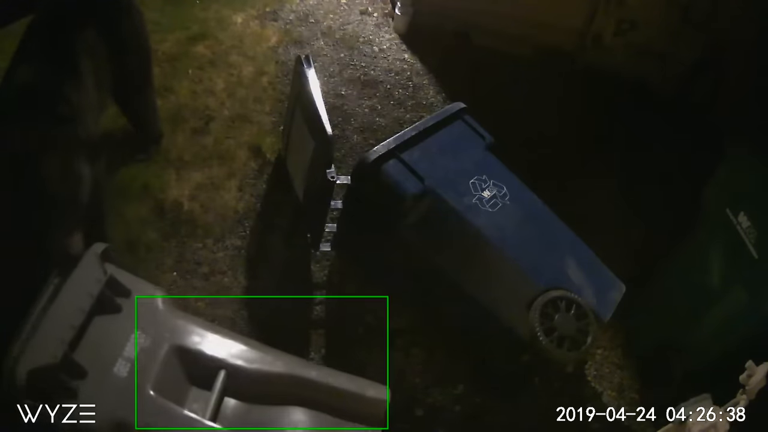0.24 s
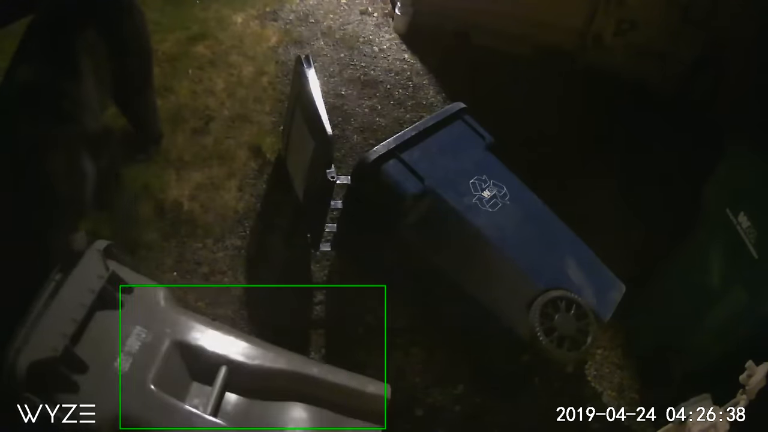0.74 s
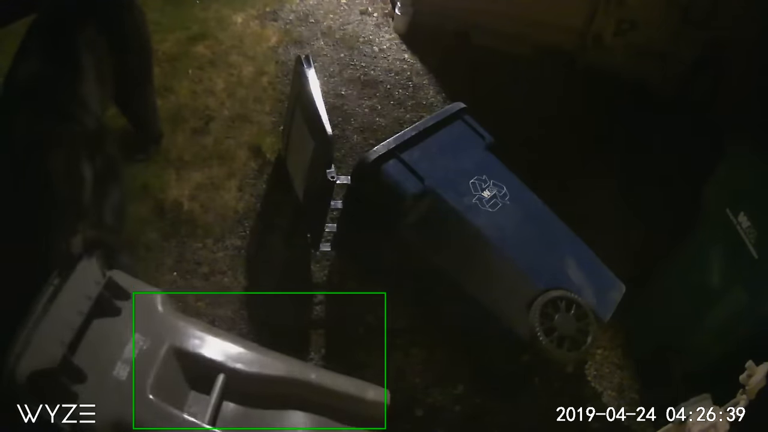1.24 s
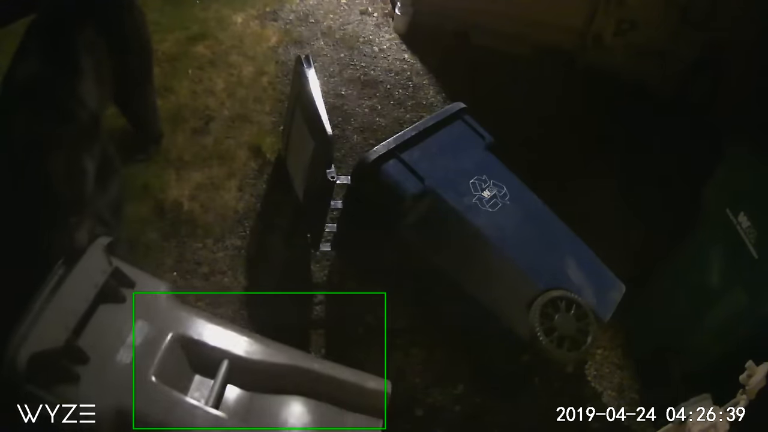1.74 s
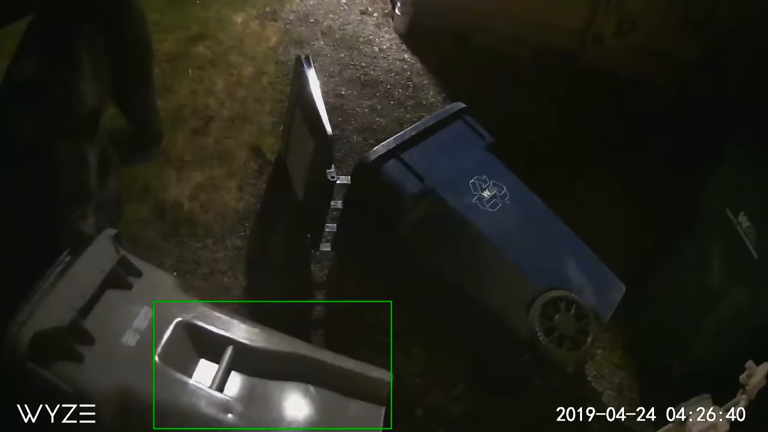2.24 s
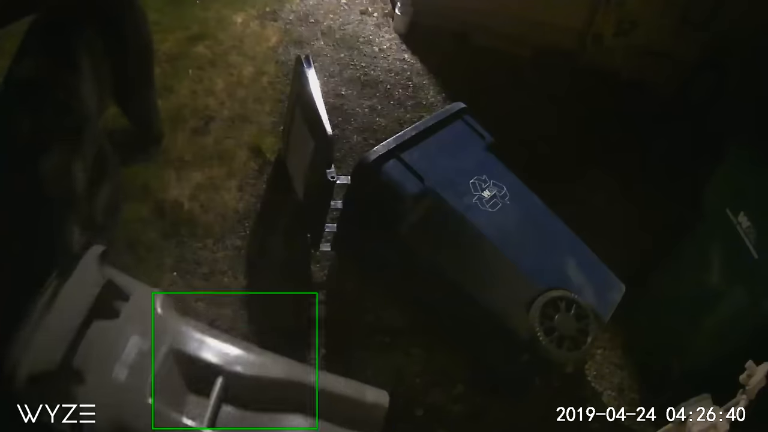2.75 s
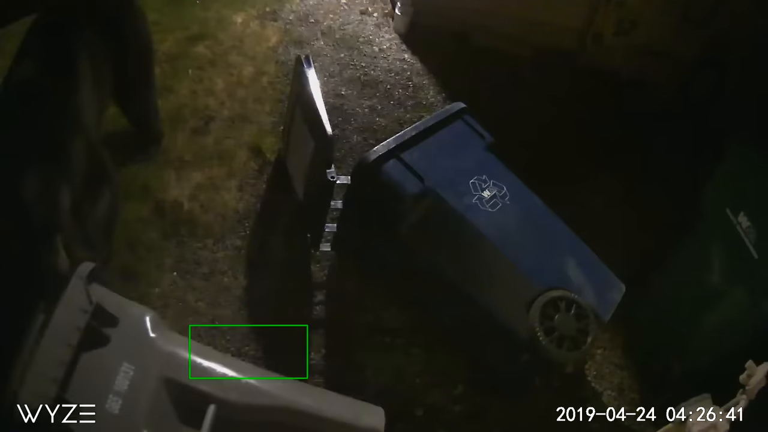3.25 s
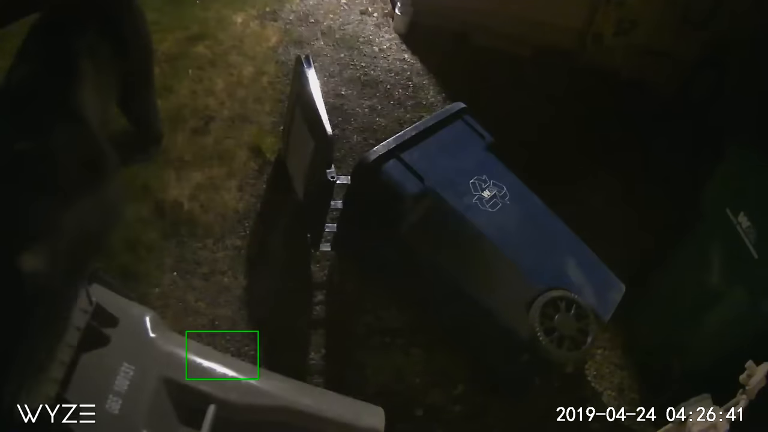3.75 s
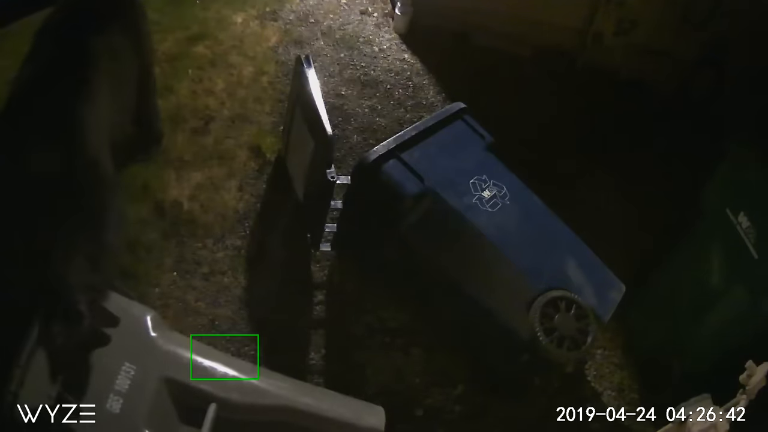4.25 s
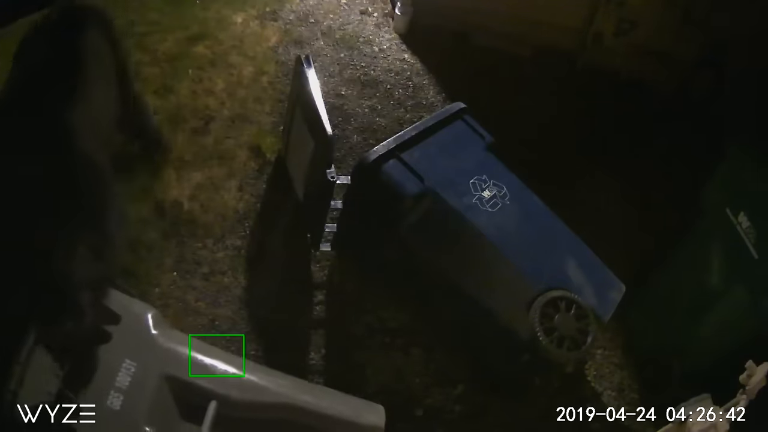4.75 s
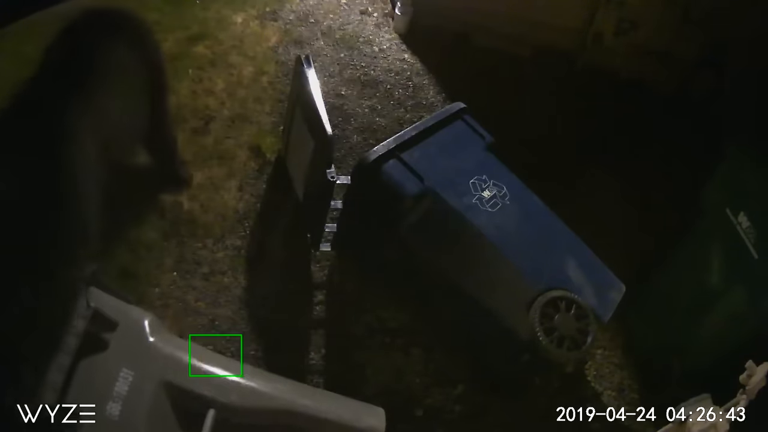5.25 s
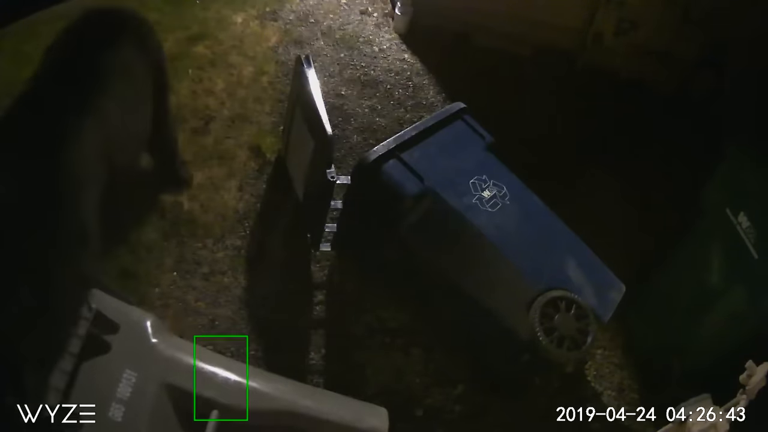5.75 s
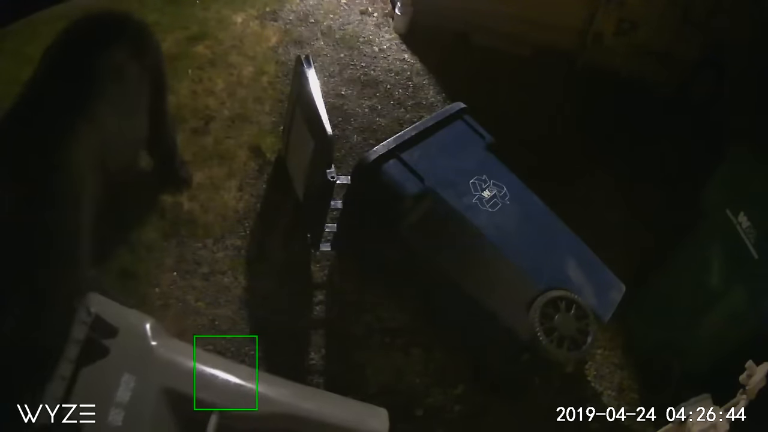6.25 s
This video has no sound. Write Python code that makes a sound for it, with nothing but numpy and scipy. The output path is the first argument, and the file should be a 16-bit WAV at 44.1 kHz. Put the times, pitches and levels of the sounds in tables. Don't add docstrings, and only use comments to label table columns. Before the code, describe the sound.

Claws and heavy paws hit the thin walls of a hollow plastic garbage bin, making short dull rattles over deep drum-like booms, with brief scrapes and gravel grit. Blows thin out to light taps, a loud bang breaks in, quiet follows, then the loudest tumble of knocks and scraping. The security camera sound is boxy, lacking clear treble, roughly digitized and ticking at regular dropouts.

```python
import sys
import numpy as np
from scipy import signal
from scipy.io import wavfile
from scipy.ndimage import uniform_filter1d, minimum_filter1d

SR = 44100
rng = np.random.default_rng(int(sys.argv[2]) if len(sys.argv) > 2 else 0)


def volts_from_db(level):
    exponent = np.asarray(level, float) / 20
    return 10 ** exponent


def master_out(mix):
    frames = np.transpose(np.atleast_2d(mix))
    ceiling = np.clip(frames, -1, 1)
    pcm = np.round(ceiling * 32767).astype(np.int16)
    wavfile.write(sys.argv[1], SR, pcm)


N = 287091
FIRST_CUT_S, PACKET_S, LOST_S = .0529, .12, .008
WORLD = N + int(56 * LOST_S * SR)
CONTROL_STEP = 32


def world_time(heard_s):
    return heard_s + LOST_S * np.ceil((np.asarray(heard_s) - FIRST_CUT_S) / PACKET_S)


def world_index(heard_s):
    return int(world_time(heard_s) * SR)


def ring(x, pitch_hz, width_hz):
    peak = signal.iirpeak(pitch_hz, pitch_hz / width_hz, fs=SR)
    return signal.lfilter(*peak, x) * np.sqrt(SR / (np.pi * width_hz))


def flutter(rate_hz, spread_db):
    hold = int(SR / rate_hz)
    steps = np.repeat(rng.standard_normal(WORLD // hold + 1), hold)
    level = uniform_filter1d(steps, hold // 2)[:WORLD]
    return volts_from_db(spread_db * level) / volts_from_db(spread_db ** 2 * np.log(10) / 20)


def decay(t, t60_s):
    return 1000 ** (-t / t60_s)


def motions(start_s, level_db, rise_s, fall_s, hold_s=0):
    t = np.arange(0, WORLD, CONTROL_STEP) / SR
    early_s = np.maximum(world_time(start_s)[:, None] - t, 0)
    late_s = np.maximum(t - world_time(start_s + hold_s)[:, None], 0)
    return level_db[:, None] - 30 * (early_s / rise_s[:, None] + late_s / fall_s[:, None])


def loudest(*levels_db):
    tops = [np.max(np.atleast_2d(level), axis=0) for level in levels_db]
    top = np.max(np.vstack(np.broadcast_arrays(*tops)), axis=0)
    return np.interp(np.arange(WORLD), np.arange(0, WORLD, CONTROL_STEP), top)


# peak_s, rumble_db, rise_s, fall_s, low_panel_share_db
SHOVES = [(.05, -28.5, 0.016, 0.43, 3.5), (.2, -18.5, .04, 0.36, -1), (.38, -17.5, 0.14, .13, -5.5),
          (0.559, -19, 0.22, 0.16, -7), (.98, -11.5, 0.055, 0.18, -11), (1.34, -38.5, 0.1, 0.15, -7),
          (1.56, -31.5, 0.21, 0.13, 3), (1.74, -28, 0.029, 0.28, -14), (1.85, -24, 0.17, 0.098, 4),
          (2.13, -24.5, 0.079, .21, 2), (2.48, -32, 0.057, 1.25, -18), (2.899, -19, .35, 0.19, -1.5),
          (3.55, -52, 0.52, 0.27, -12), (3.73, -13.5, 0.097, 0.13, -2.5), (4.02, -15.5, 0.11, 0.15, -5.5),
          (4.17, -26.5, 0.14, 0.15, -6.5), (4.33, -23.5, 0.081, 0.11, -14), (4.45, -47, .1, .8, -3),
          (5.29, -23, 0.11, 0.52, 1), (5.44, -23.5, 0.17, 0.24, -1), (5.64, -12.5, 0.14, .3, -4),
          (5.78, -17.5, 0.3, 0.13, 3), (6.02, -38, .5, .09, -3), (6.29, -37.5, 0.023, 0.13, 8.5)]


def shoves():
    *shape, share_db = np.transpose(SHOVES)
    rock_db = motions(*shape)
    return rock_db, rock_db + share_db[:, None]


# start_s, scrape_db, rise_s, fall_s, hold_s
DRAGS = [(0.052, -49, .02, .15, 0.082), (.2, -43.5, 0.045, .3, .1), (0.375, -32, 0.25, 0.13, .01),
         (0.467, -38.5, .07, 0.066, 0.011), (0.553, -45.5, 0.11, 0.14, .04), (1.102, -54, 0.29, 0.55, .38),
         (1.55, -50.5, .6, 0.23, .3), (2.117, -49, .06, .13, .15), (1.019, -39, .05, .25, 0.036),
         (1.244, -52, 0.092, .15, .08), (.66, -45, .03, .12, .09), (2.94, -38, .05, .12, .09),
         (2.68, -40, .17, 0.16, 0.2), (3.75, -56, .2, 0.74, 0.49), (4.415, -46, 0.13, 0.42, 0.19),
         (4.76, -47, .1, .2, 0.035), (4.94, -52.5, .08, .3, .14), (5.092, -37.5, .02, .6, .13),
         (5.27, -36.5, 0.3, .3, .05), (5.441, -22, 0.47, 0.27, 0.0071), (5.591, -22, 0.34, .22, 0.098),
         (5.86, -38.5, 0.19, .14, .15), (6.084, -55, .1, 0.19, .1), (6.297, -50.5, .05, .12, .1),
         (6.5, -46, 0.04, .1, .01)]


def drags():
    return motions(*np.transpose(DRAGS))


# start_s, rattle_peak_db, loudest_pitch_hz, rattle_t60_s
CLAWS = [(0.053, -18.5, 894, 0.12), (0.195, -12, 913, 0.088), (0.366, -17, 845, 0.18),
         (0.466, -21, 864, 0.15), (0.539, -9.5, 752, 0.14), (0.94, -20, 804, 0.16),
         (1.536, -20.5, 910, 0.19), (1.746, -24.5, 718, 0.074), (1.826, -16, 935, 0.22),
         (2.062, -31, 910, 0.34), (2.464, -23.5, 950, 0.1), (2.642, -27, 1023, 0.16),
         (2.695, -21.5, 833, 0.077), (2.77, -25.5, 800, 0.12), (3.713, -9, 1034, 0.17),
         (3.989, -28.5, 1050, 0.14), (4.306, -29, 690, 0.29), (4.013, -20, 798, 0.052),
         (5.33, -17, 834, 0.41), (5.374, -14.5, 1017, 0.16), (5.506, -24, 1040, 0.23),
         (5.58, -15, 1032, 0.11), (5.61, -9.5, 982, 0.21), (5.689, -14.5, 970, 0.25),
         (5.734, -16.5, 980, 0.065), (5.89, -20.5, 724, 0.16), (5.927, -11.5, 1015, 0.057),
         (3.714, -14, 810, 0.09), (6.296, -13, 980, 0.085)]
# start_s, rattle_peak_db, loudest_pitch_hz, rattle_t60_s
PAWS = [(0.101, -15, 455, 0.08), (0.237, -12, 362.6, 0.12), (0.269, -14.5, 367, 0.097),
        (0.313, -27, 320, 0.2), (0.941, -17.5, 437, 0.25), (0.969, -13.5, 880, 0.28),
        (1.497, -31.5, 545, 0.46), (1.732, -36, 526, 0.12), (1.786, -18.5, 344, 0.11),
        (2.115, -11.5, 371, 0.18), (2.558, -26, 368, 0.43), (2.811, -18, 323, 0.18),
        (2.871, -13, 597, 0.27), (2.902, -14.5, 405, 0.2), (3.031, -29, 696, 0.12),
        (3.669, -20.5, 605, 0.13), (3.964, -32.5, 395, 0.29), (4.012, -17.5, 679, 0.18),
        (4.129, -35, 330, 0.086), (4.164, -30.5, 690, 0.15), (4.323, -24.5, 361, 0.22),
        (4.97, -36, 344, 0.15), (5.091, -27, 381, 0.26), (5.165, -29, 330, 0.21), (5.221, -31.5, 624, 0.2),
        (5.271, -16.5, 448, 0.15), (5.548, -17, 660, 0.1), (5.759, -10, 403.5, 0.17),
        (5.847, -26.5, 410, 0.22), (0.59, -24, 285, 0.14)]
# start_s, rattle_peak_db, loudest_pitch_hz, rattle_t60_s
TAPS = [(2.075, -27, 700, 0.27), (1.335, -40.5, 460, 0.1), (1.37, -47.5, 295, 0.11),
        (1.453, -39, 428, 0.08), (1.984, -41, 704, 0.068), (3.092, -47.5, 505, 0.11),
        (3.32, -33.5, 623, 0.16), (3.387, -44.5, 330, 0.087), (3.53, -44.5, 387, 0.092),
        (3.59, -44.5, 686, 0.2), (3.609, -40, 1160, 0.19), (3.908, -44.5, 535, 0.22),
        (4.25, -43, 302, 0.096), (4.418, -46, 690, 0.19), (4.484, -45, 1195, 0.11), (4.606, -44, 830, 0.13),
        (4.654, -32, 1070, 0.15), (4.757, -43.5, 1010, 0.18), (4.931, -40, 483, 0.1),
        (5.062, -51, 370, 0.11), (5.95, -30.5, 990, 0.27), (6.121, -53, 930, 0.22), (6.17, -37, 778, 0.14),
        (6.266, -42, 1000, 0.16), (6.493, -39.5, 980, 0.17), (0.651, -29.5, 972, 0.13),
        (0.664, -31, 977, 0.14), (4.668, -29, 950, 0.072), (6.222, -27, 885, 0.13), (6.394, -31, 690, 0.12)]
# pitch_hz, level_db
WALL_COLOUR = [(150, -34), (250, -2), (331, -1.5), (531, -8.5), (606, -4), (660, -2), (873, -1), (1040, 1),
               (1600, -20.5), (2080, -55), (3520, -120)]
SPREAD_OCT, CONTACT_CYCLES, RING_T60_S, TAP_LOW_CUT_DB_PER_OCT = .25, 1.4, 0.057, 8.5
MIDDLE_HZ, FAR_DB, FAR_DB_PER_OCT = 690, -5.5, 1.04
RING_DB, RING_LOW_DB_PER_OCT, RING_HIGH_DB_PER_OCT = -8.5, 7.5, 8.5


def wall_blows(modes_hz):
    curve_hz, curve_db = np.transpose(WALL_COLOUR)
    colour = volts_from_db(np.interp(np.log(modes_hz), np.log(curve_hz), curve_db))
    t = np.arange(SR // 3) / SR
    length = WORLD + len(t)
    chatter = rng.standard_normal(length) * np.resize(flutter(140, 4.3), length)
    blows = CLAWS + PAWS + TAPS
    chance = rng.standard_normal((len(blows), len(modes_hz)))
    is_tap = np.arange(len(blows)) >= len(blows) - len(TAPS)
    push, clear = np.zeros((len(modes_hz), length)), np.zeros(length)
    for (start_s, level_db, spot_hz, t60_s), luck, light in zip(blows, chance, is_tap):
        spot_oct = np.log2(spot_hz / MIDDLE_HZ)
        far_db = FAR_DB + FAR_DB_PER_OCT * spot_oct
        ring_db = RING_DB + max(RING_HIGH_DB_PER_OCT * spot_oct, -RING_LOW_DB_PER_OCT * spot_oct)

        distance_oct = np.log2(modes_hz / spot_hz)
        near = np.exp(-(distance_oct / SPREAD_OCT) ** 2)
        share = near + volts_from_db(far_db + 2.5 * np.abs(luck)) * colour * np.sign(luck)
        share = share * volts_from_db(light * TAP_LOW_CUT_DB_PER_OCT * np.minimum(distance_oct, 0))

        i = world_index(start_s)
        rise_s = CONTACT_CYCLES / spot_hz
        onset = 1 - np.exp(-t / rise_s)
        force = chatter[i:i + len(t)] * onset * decay(t, t60_s)
        force[0] = 9 * 0.0022 / max(rise_s, .002)
        push[:, i:i + len(t)] += volts_from_db(level_db - 7) * np.outer(share / np.linalg.norm(share), force)
        tone = np.sin(2 * np.pi * spot_hz * t)
        clear[i:i + len(t)] += volts_from_db(level_db + ring_db) * onset * tone * decay(t, RING_T60_S)
    return push[:, :WORLD], clear[:WORLD]


# pitch_hz, level_db
RUB = [(260, 0), (400, -6), (660, -2), (900, -4), (1200, -1), (1480, -9.5)]
WALL_WIDTH_HZ = 55


def walls(scrape, low_gain):
    modes_hz = np.linspace(260, 1480, 28) * (1 + .015 * rng.standard_normal(28))
    push, out = wall_blows(modes_hz)
    curve_hz, curve_db = np.transpose(RUB)
    even = volts_from_db(np.interp(np.log(modes_hz), np.log(curve_hz), curve_db))
    rub = even * np.sign(rng.standard_normal(len(modes_hz))) / np.linalg.norm(even)
    low_scrape = scrape * low_gain
    for pitch_hz, blow, share in zip(modes_hz, push, rub):
        drive = low_scrape if pitch_hz < 600 else scrape
        out = out + ring(blow + share * drive, pitch_hz, WALL_WIDTH_HZ)
    return out


# start_s, peak_db, pitch_hz, t60_s
RINGS = [(.053, -22.5, 462, 0.063), (3.714, -11, 1055, .07), (.099, -22, 460, .08), (.195, -16.5, 431, .06),
         (.196, -17.5, 921, .05), (.266, -13, 381.5, .1), (.47, -25, 464, .14), (.533, -22.5, 302, 0.067),
         (.549, -19.5, 257, 0.089), (.603, -25.5, 280, 0.084), (.942, -22, 256, 0.073),
         (.966, -19, 633, 0.056), (1.744, -24.5, 740, .06), (1.825, -25.5, 732, 0.065),
         (.942, -21, 1034, .07), (2.064, -22, 963, .08), (2.113, -13, 394, 0.095), (2.19, -27, 255, 0.099),
         (2.64, -28, 700, 0.065), (5.58, -14, 1028, .06), (2.768, -24.5, 1077, 0.052),
         (2.811, -23, 607, 0.065), (2.866, -19.5, 322, .07), (2.868, -13, 598, .07),
         (2.899, -16.5, 388, 0.073), (2.905, -18, 600, 0.057), (3.731, -16, 330, .08),
         (6.295, -15, 991, .06), (4.321, -31.5, 1298, .06), (4.323, -30, 861, 0.065),
         (4.335, -28, 255, .08), (4.666, -29.5, 890, 0.082), (5.277, -19, 260, 0.068),
         (5.375, -15.5, 1170, .07), (5.441, -19, 1020, 0.062), (5.474, -25, 805, 0.066),
         (5.503, -22.5, 795, .06), (5.549, -19, 1124, .06), (5.575, -18, 380, .07), (5.611, -14, 533, .07),
         (5.632, -11.5, 1012, 0.097), (5.663, -16, 1057, .06), (5.685, -16, 1001, 0.057),
         (5.707, -17.5, 1160, .06), (5.731, -12.5, 1001, 0.064), (5.761, -14.5, 376, .07),
         (5.765, -17, 764, .05), (5.924, -17, 1023, 0.044), (5.98, -33, 392, .12), (6.294, -21, 458, 0.069)]
RING_RISE_CYCLES = 1.5


def lone_panels():
    t = np.arange(SR // 4) / SR
    out = np.zeros(WORLD + len(t))
    for start_s, peak_db, pitch_hz, t60_s in RINGS:
        i = world_index(start_s)
        swell = 1 - np.exp(-t * pitch_hz / RING_RISE_CYCLES)
        out[i:i + len(t)] += volts_from_db(peak_db) * swell * np.sin(2 * np.pi * pitch_hz * t) * decay(t, t60_s)
    return out[:WORLD]


# pitch_hz, width_hz, level_db
BODY = [(68.3, 17, 1.5), (87.3, 18, 2), (111.6, 16, -3.5), (140, 14, -4), (168.5, 21, -6), (198.6, 15, -5),
        (240.5, 58, -10.5)]


def body_murmur(rumble):
    out = np.zeros(WORLD)
    for k, (pitch_hz, width_hz, level_db) in enumerate(BODY):
        out += (-1) ** k * volts_from_db(level_db - 3.5) * ring(rumble, pitch_hz, width_hz)
    return out


# start_s, peak_db, pitch_hz, t60_s
BOOMS = [(0.094, -18, 163, 0.18), (0.193, -10.5, 133.3, 0.12), (0.538, -14.5, 86.3, 0.13),
         (0.95, -22, 114, 0.17), (0.975, -20, 137.7, 0.22), (1.335, -30.5, 95, 0.22),
         (1.539, -37.5, 277, 0.15), (1.548, -29, 94.2, 0.21), (1.803, -29, 140, 0.18),
         (1.823, -13.5, 83.2, 0.12), (2.111, -15, 51.5, 0.16), (2.465, -27.5, 98, 0.2),
         (2.828, -27, 134, 0.48), (2.887, -14, 118.6, 0.15), (3.198, -30, 73.8, 0.2),
         (3.345, -26, 74.3, 0.21), (3.503, -35.5, 77.5, 0.33), (2.065, -27, 80, 0.18),
         (3.722, -8.5, 74.9, 0.13), (4.009, -13.5, 125, 0.16), (4.153, -19.5, 107.2, 0.29),
         (4.322, -26.5, 85, 0.16), (4.585, -39.5, 167, 0.13), (1.975, -41, 85, 0.25),
         (5.149, -34, 91.3, 0.17), (5.29, -18, 195.2, 0.32), (5.404, -16.5, 100.7, 0.21),
         (5.635, -22, 145.4, 0.14), (6.112, -46, 66, 0.2), (6.287, -32, 239.6, 0.16),
         (0.196, -17, 91.6, .15), (.54, -21, 167.4, .13), (1.012, -14, 107.8, .17), (2.23, -30, 108, .16),
         (2.555, -28, 86, 0.14), (2.68, -30.5, 200, .14), (2.71, -31.5, 129, 0.16),
         (3.727, -17, 156.4, .13), (5.08, -41.5, 129, .15), (5.085, -39.5, 194, 0.17),
         (5.323, -20, 86, 0.13), (5.413, -21, 205.6, .15), (5.585, -19, 70, 0.27), (5.656, -9, 74.9, 0.21),
         (5.72, -17.5, 64.1, 0.31), (5.895, -27, 63.8, 0.49), (5.97, -28, 66.2, 0.24),
         (4.995, -42, 140, 0.17), (.76, -45, 62, 0.29), (1.735, -30, 100, 0.14)]
OVERTONE_DB, OVERTONE_DB_PER_DB = -6, 0.36


def body_booms():
    t = np.arange(SR // 2) / SR
    out = np.zeros(WORLD + len(t))
    for (start_s, peak_db, pitch_hz, t60_s), (turn, partner) in zip(BOOMS, rng.random((len(BOOMS), 2))):
        swell = (1 - np.exp(-t * pitch_hz / 0.29)) ** 2 * decay(t, t60_s)
        tone = np.sin(2 * np.pi * (pitch_hz * t + turn))
        overtone = np.sin(2 * np.pi * pitch_hz * (2.0 + .7 * partner) * t) * np.exp(-t / 0.04)
        overtone_db = OVERTONE_DB + OVERTONE_DB_PER_DB * (peak_db + 15)
        i = world_index(start_s)
        out[i:i + len(t)] += volts_from_db(peak_db + 1.5) * swell * (tone + volts_from_db(overtone_db) * overtone)
    return out[:WORLD]


# peak_s, grit_db, rise_s, fall_s
SPRAYS = [(.545, -32.5, .008, 0.044), (4.795, -47, 0.12, 0.12), (3.718, -28.5, .008, 0.055),
          (5.93, -36, .01, 0.033), (.945, -37, 0.0095, .1), (.198, -33, .008, .04), (4.62, -56.5, .3, .3),
          (2.7, -46, 0.066, 0.13), (4.77, -50, .06, .05)]


def sprays():
    return motions(*np.transpose(SPRAYS))


def gravel(grit_db, noise):
    stones = ring(ring(noise, 2300, 1500), 2300, 1500) / 2.5
    return volts_from_db(grit_db - 7.0) * flutter(110, 4.5) * stones


# start_s, level_db, pitch_hz, length_s
CREAKS = [(3.8, -50, 990, .1), (4.4, -52.5, 653, 0.088), (4.41, -53, 1200, 0.08), (4.5, -53, 1190, .12),
          (4.51, -55, 740, 0.14), (4.76, -53, 340, .12), (4.74, -50, 900, 0.069), (4.95, -54.5, 1100, 0.15),
          (4.98, -53, 430, .11), (5.94, -32.5, 980, 0.045), (5.39, -25.5, 1000, 0.076),
          (5.5, -29.5, 1010, .05), (6.05, -57, 950, .12), (1.385, -52, 1000, .06)]
CREAK_WIDTH_HZ = 15


def edge_creaks():
    t = np.arange(SR // 4) / SR
    out = np.zeros(WORLD + len(t))
    noises = rng.standard_normal((len(CREAKS), len(t)))
    for (start_s, level_db, pitch_hz, length_s), noise in zip(CREAKS, noises):
        i = world_index(start_s)
        arch = np.sin(np.pi * np.minimum(t / length_s, 1)) ** .5
        out[i:i + len(t)] += volts_from_db(level_db) * arch * ring(noise, pitch_hz, CREAK_WIDTH_HZ)
    return out[:WORLD]


STILL_LOW_DB, STILL_SCRAPE_DB, STILL_RUMBLE_DB, STILL_GRIT_DB = -84, -76.5, -70.5, -70.5
DRAG_LOW_DB, DRAG_RUMBLE_DB, DRAG_GRIT_DB, SHOVE_GRIT_DB = -4.5, -13, -19, -24
GRIT_RATIO = 1.22


def contact_levels():
    rock_db, low_rock_db = shoves()
    drag_db = drags()
    low_db = loudest(low_rock_db, drag_db + DRAG_LOW_DB, STILL_LOW_DB)
    scrape_db = loudest(drag_db, STILL_SCRAPE_DB)
    rumble_db = loudest(rock_db, drag_db + DRAG_RUMBLE_DB, STILL_RUMBLE_DB)
    shove_grit_db = GRIT_RATIO * rock_db + SHOVE_GRIT_DB
    grit_db = loudest(shove_grit_db, drag_db + DRAG_GRIT_DB, sprays(), STILL_GRIT_DB)
    return minimum_filter1d([low_db, scrape_db, rumble_db, grit_db], size=401, origin=200)


HOUSING_HZ, PORT_HZ, OVERLOAD = 1343, 60.3, 1.1


def camera_microphone(bin_sound, grit):
    muffle = signal.butter(7, HOUSING_HZ, fs=SR, output="sos")
    port = signal.butter(3, PORT_HZ, "high", fs=SR, output="sos")
    muffled = signal.sosfilt(np.vstack([muffle, port]), bin_sound)
    return OVERLOAD * np.tanh((muffled + grit) / OVERLOAD)


# start_s, jump_db
SEAMS = [(.173, -46), (.413, -28.5), (.653, -26.5), (1.013, -30), (1.133, -35), (1.373, -33.5),
         (1.853, -30), (2.093, -22), (2.213, -22.5), (2.693, -29.5), (2.813, -13.5), (2.933, -16),
         (3.413, -35), (3.533, -43), (3.773, -21), (3.893, -37.5), (4.133, -24), (4.253, -31.5),
         (4.733, -44), (4.973, -43), (3.293, -50), (5.093, -34), (5.213, -28), (5.333, -16), (5.453, -18.5),
         (5.573, -11.5), (5.693, -10), (5.813, -18.5), (5.933, -24), (6.173, -45), (6.293, -32),
         (6.413, -43)]
QUIET_SEAM_DB = -14.5


def packets(sound):
    heard = sound[np.round(world_time(np.arange(N) / SR) * SR).astype(int)]
    cuts = (np.floor(np.arange(FIRST_CUT_S, N / SR, PACKET_S) * SR) + 1).astype(int)
    jump = heard[cuts] - heard[cuts - 1]
    size = np.abs(jump) * volts_from_db(QUIET_SEAM_DB)
    start_s, jump_db = np.transpose(SEAMS)
    size[np.round((start_s - FIRST_CUT_S) / PACKET_S).astype(int)] = volts_from_db(jump_db)
    correction = np.zeros(N)
    correction[cuts] = np.sign(jump) * size - jump
    return heard + signal.lfilter([1], [1, -np.exp(-1 / (0.0011 * SR))], correction)


def scene():
    low_db, scrape_db, rumble_db, grit_db = contact_levels()
    noise = rng.standard_normal((4, WORLD))
    scrape = volts_from_db(scrape_db - 0.5) * flutter(60, 2.2) * flutter(300, 2.5) * noise[0]
    rumble = volts_from_db(rumble_db - 2.5) * flutter(25, 2.7) * noise[1]
    grit = gravel(grit_db, noise[2])
    background = volts_from_db(-74) * ring(noise[3], 300, 820)
    bin_sound = walls(scrape, volts_from_db(low_db - scrape_db)) + lone_panels()
    bin_sound += body_murmur(rumble) + body_booms() + edge_creaks() + background
    heard = packets(camera_microphone(bin_sound, grit))
    return np.array([heard, heard])


CAMERA_SR = 8000


def camera_samples(sound):
    tick = np.floor(np.arange(N) * CAMERA_SR / SR + .8)
    source = np.ceil((tick - .8) * SR / CAMERA_SR)
    samples = sound[np.clip(source, 0, N - 1).astype(int)]
    squeezed = np.round(128 * np.log1p(255 * np.abs(samples)) / np.log(256)) / 128
    return np.sign(samples) * np.expm1(squeezed * np.log(256)) / 255


# lower_edge_hz, least_level_db
TREBLE_BANDS = [(7700, -79), (8300, -95), (8600, -75), (9800, -60), (10250, -72), (10850, -72),
                (11700, -68), (12300, -67), (13300, -58), (13900, -50), (14400, -49.5), (15300, -51),
                (15900, 0)]


def treble_dropouts(sound):
    f, _, z = signal.stft(sound, SR, nperseg=1024)
    edges_hz, least_db = np.transpose(TREBLE_BANDS)
    band = np.searchsorted(edges_hz, f)
    masking_db = 3 * np.log10(np.sum(np.abs(z) ** 2, axis=0) + 1e-9) + 8
    for k, floor_db in enumerate(least_db, 1):
        power = np.sum(np.abs(z[band == k]) ** 2, axis=0)
        wander_db = 3.0 * uniform_filter1d(rng.standard_normal(len(power)), size=2)
        z[band == k] *= power > volts_from_db(2 * (floor_db + masking_db + wander_db))

    odd_chance = np.where(rng.random(z.shape[1]) < .12, .8, .05)
    odd = rng.random((40, z.shape[1])) < odd_chance
    side_db = np.interp(f, [100, 500, 4500, 14000], [-37, -28.5, -11.5, -11])
    patch = odd[np.minimum(f / 600, 39).astype(int)] * volts_from_db(side_db)[:, None]
    side = z * patch * np.exp(2j * np.pi * rng.random(z.shape))
    return signal.istft(np.array([z + side, z - side]), SR, nperseg=1024)[1][:, :N]


def low_pass(x):
    return signal.sosfilt(signal.butter(12, 16940, fs=SR, output="sos"), x)


def record(dry):
    held = camera_samples(dry[0])
    mix = treble_dropouts(held)
    return low_pass(mix)


dry = scene()
out = record(dry)
master_out(out)
```